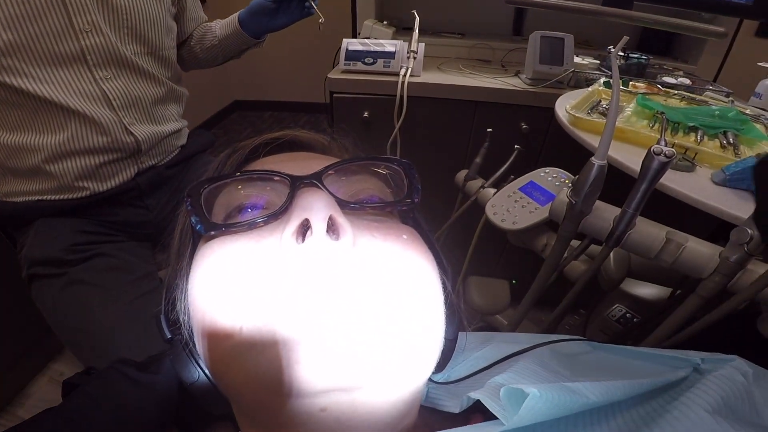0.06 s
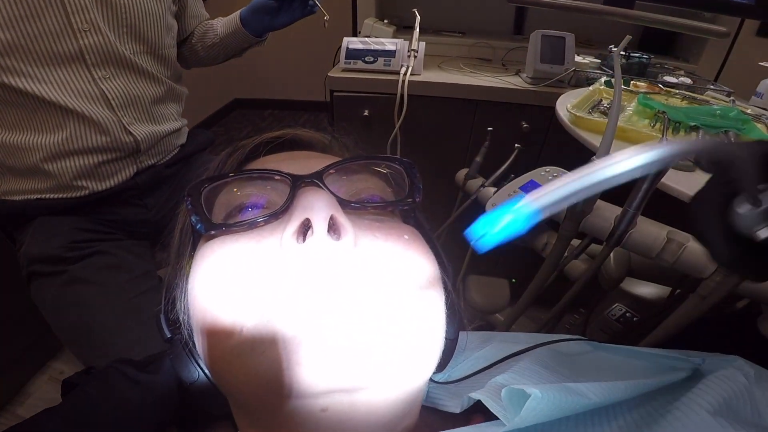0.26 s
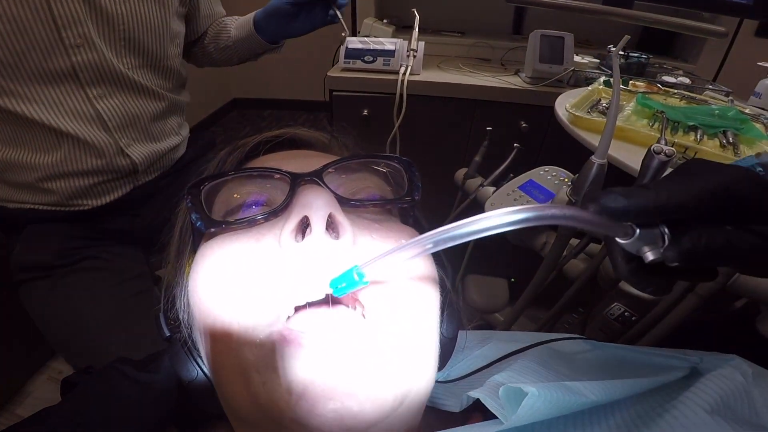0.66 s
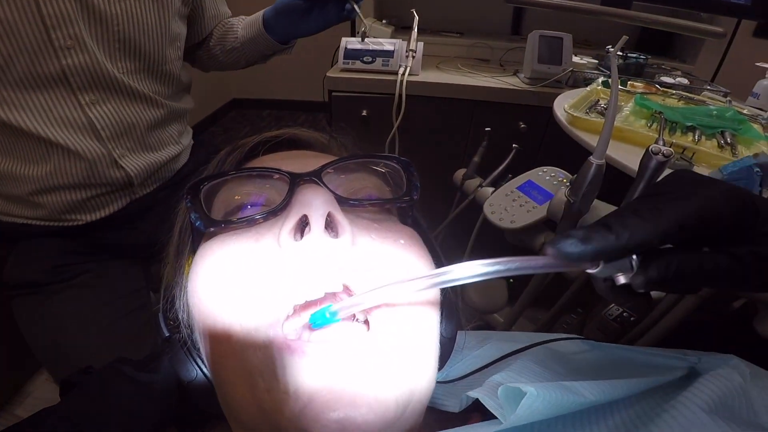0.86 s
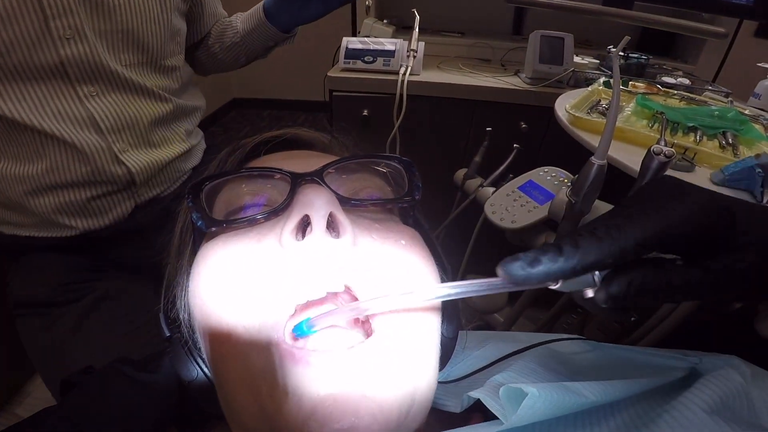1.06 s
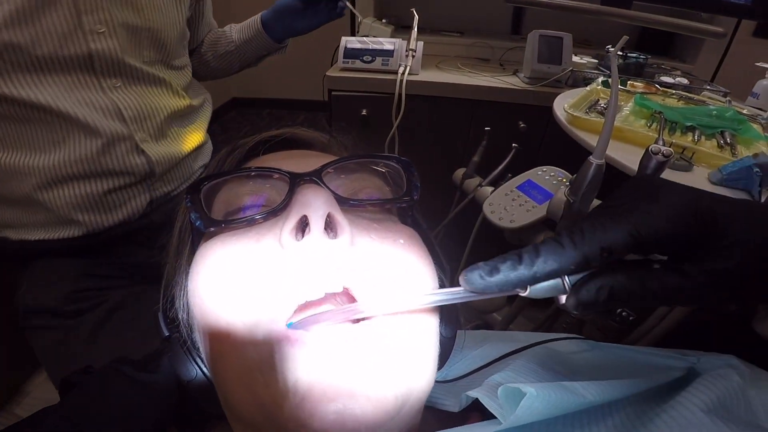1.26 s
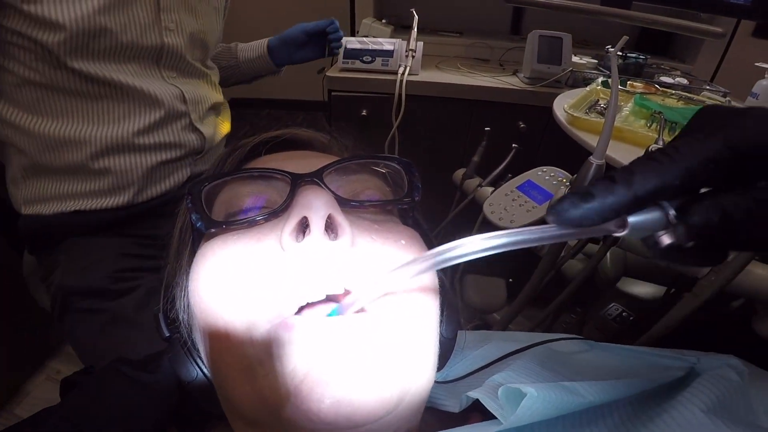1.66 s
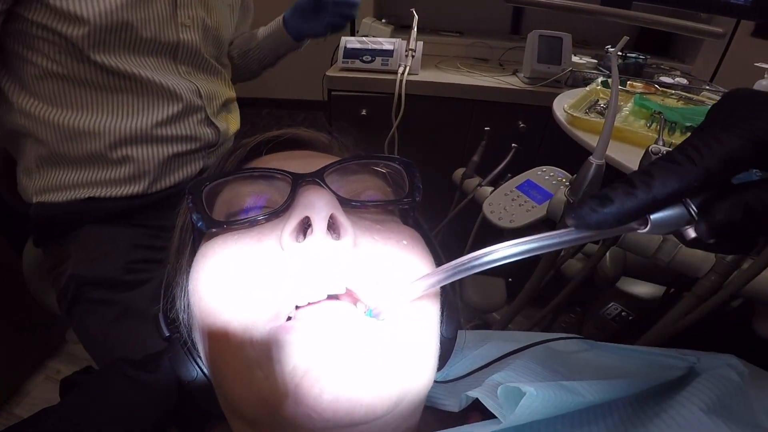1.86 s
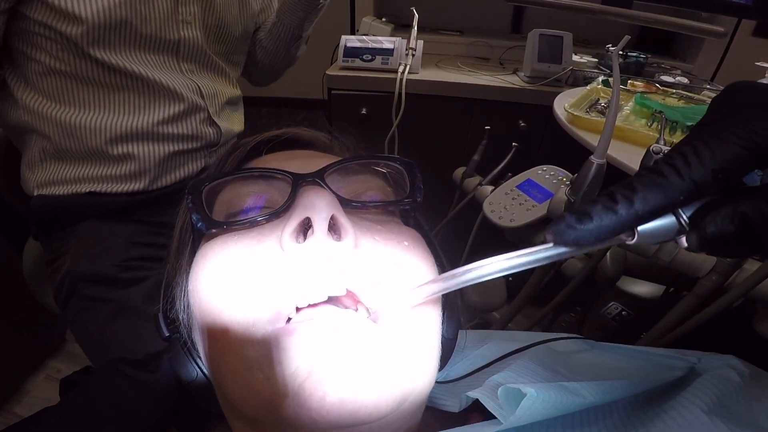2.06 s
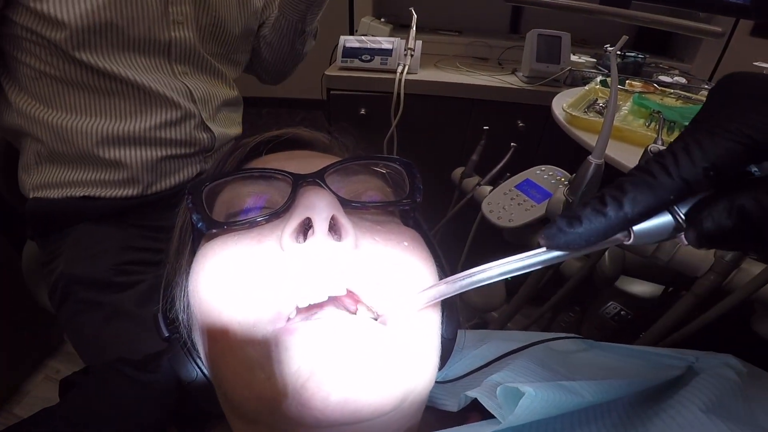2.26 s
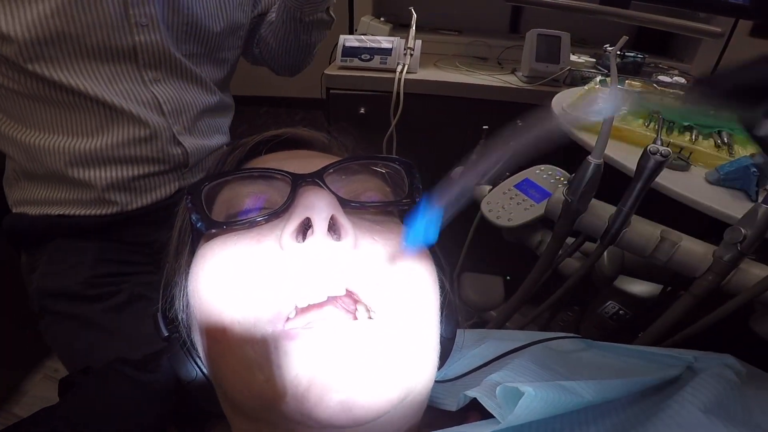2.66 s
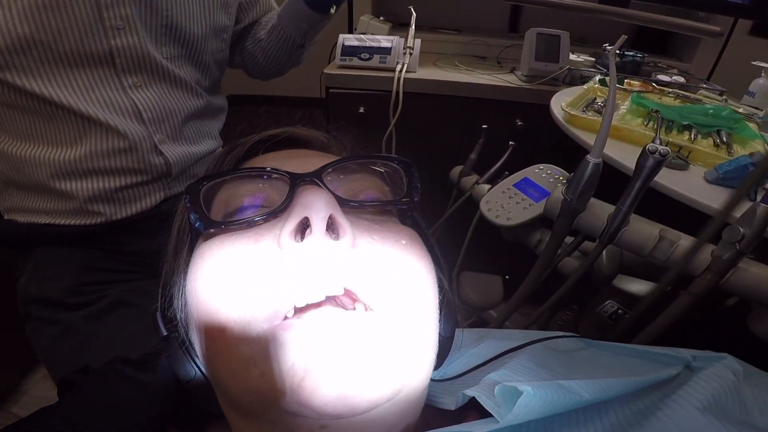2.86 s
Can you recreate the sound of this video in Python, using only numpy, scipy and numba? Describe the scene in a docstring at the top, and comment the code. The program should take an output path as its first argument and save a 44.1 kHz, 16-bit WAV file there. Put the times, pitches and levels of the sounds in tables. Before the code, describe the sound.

Close up, a dental suction tube hisses steadily, then draws saliva from a mouth in choppy slurps, sputters and brief squeaks. A valve click cuts it off, leaving the low ventilation hum of a small surgery.

```python
"""A small dental surgery with a low ventilation hum. A suction tube hisses as it nears an open mouth,
then draws saliva: the rush turns wet and rings the mouth cavity. The tip sticks to the cheek, frees
itself in slurps, squeaks and sputters, hisses again and is shut off with a snap of the valve.
The close microphone overloads on the loudest slurps."""
import sys
import numpy as np
from scipy import signal
from scipy.fft import rfft, irfft
from scipy.io import wavfile
from scipy.ndimage import map_coordinates
from numba import njit

SR = 44100
rng = np.random.default_rng(int(sys.argv[2]) if len(sys.argv) > 2 else 0)


def master_out(mix):
    """Clip the mix to full scale and print it as 16-bit PCM to the path in sys.argv[1]."""
    frames = np.transpose(np.atleast_2d(mix))
    ceiling = np.clip(frames, -1, 1)
    pcm = np.round(ceiling * 32767).astype(np.int16)
    wavfile.write(sys.argv[1], SR, pcm)


N = 132300

# envelope of the air jet at the tip: t/s, level/dB
JET_LEVEL = [(0, -37.5), (.015, -22.5), (.03, -47), (.078, -56), (.088, -33.5), (.14, -31), (.2, -23),
             (.3, -19), (.5, -17.5), (.9, -18.5), (1.2, -22), (1.36, -16), (1.46, -35), (1.51, -28),
             (1.62, -25.5), (1.74, -14.5), (1.85, -25), (1.9, -22), (1.97, -21), (2.01, -24), (2.03, -44),
             (2.06, -20), (2.14, -37), (2.21, -25), (2.265, -42), (2.32, -34), (2.38, -23), (2.45, -14.5),
             (2.5, -22), (2.65, -17.5), (2.752, -16.5), (2.764, -61)]
# tone of the jet in open air: f/Hz, level/dB
JET_SPECTRUM = [(300, -15.5), (1000, -14), (1700, -4.5), (2700, -4.5), (3400, 2.5), (4800, 2.5),
                (6500, 3.5), (7200, 0), (9300, -0.5), (10600, -1.5), (11900, 1.5), (15000, 1.5)]
# how far the tip is inside the mouth: t/s, depth/0-1
TIP_DEPTH = [(.6, 0.21), (1.05, 0.22), (1.7, 0.7), (2.5, 0.57), (2.66, 0)]
# saliva in the stream: t/s, wetness/0-1
WETNESS = [(.4, 0.08), (.85, 0.06), (1.2, 0.58), (1.45, 0.89), (1.7, 0.36), (2.1, 0.86), (2.45, 0.67),
           (2.75, 0.5)]
# resonances that take over from the open hiss inside the mouth: f/Hz, width/Hz, level/dB
JET_MODES = [(6610, 190, -2), (7840, 1100, -2), (9240, 710, -3.5), (10580, 910, -4.5), (12080, 1500, 1.5),
             (14170, 3200, 0)]
# echoes off teeth and cheek: delay/s, gain at full wetness, wander/share of the delay
CHEEK_ECHOES = [(.000343, 0.54, 0.074), (.00105, 0.074, 0.055)]
# sweep of the low mouth resonance: t/s, f/Hz
LOW_SWEEP = [(.7, 1780), (.9, 1525), (1.17, 1330), (1.29, 1398), (1.42, 1765), (1.53, 1823), (1.7, 1713),
             (1.82, 1470), (1.98, 1745), (2.08, 1926), (2.24, 1650), (2.42, 1420), (2.6, 1320)]
# its envelope: t/s, level/dB
LOW_LEVEL = [(.1, -68), (.6, -43), (.95, -30.5), (1.2, -28.5), (1.27, -17), (1.32, -18), (1.42, -23),
             (1.55, -18.5), (1.61, -21.5), (1.72, -21), (1.84, -23), (1.88, -42.5), (2.12, -38),
             (2.3, -44.5), (2.37, -32), (2.42, -18.5), (2.55, -24.5), (2.63, -39), (2.76, -57)]
# sweep of the middle mouth resonance, a pair of peaks: t/s, f/Hz, split/factor
MID_SWEEP = [(.7, 3870, 0.91), (1.15, 3970, 0.69), (1.29, 3874, 1), (1.5, 3806, 0.89), (1.65, 4150, 0.35),
             (1.78, 3760, 0.42), (2.12, 3890, 0.66), (2.33, 3950, 1), (2.46, 4140, 0.28)]
# its peaks: offset at split 1/Hz, width/Hz, level/dB
MID_PEAKS = [(-280, 510, 0.5), (294, 410, -0.5)]
# its envelope: t/s, level/dB
MID_LEVEL = [(.1, -62), (.35, -41), (.65, -30.5), (1.1, -25), (1.22, -22), (1.28, -13), (1.32, -22),
             (1.5, -13), (1.61, -26.5), (1.75, -23), (1.84, -18), (1.9, -38), (2.03, -42), (2.12, -17.5),
             (2.2, -30.5), (2.31, -31), (2.36, -22.5), (2.47, -16), (2.57, -22), (2.75, -37), (2.76, -78)]
# sweep of the high mouth resonance, also a pair: t/s, f/Hz
HIGH_SWEEP = [(.22, 4680), (.48, 5060), (.8, 5340), (1.0, 6000), (1.37, 5870), (1.44, 5130), (1.7, 5440),
              (1.875, 5720), (1.9, 5000), (1.925, 5730), (2.0, 6100), (2.22, 5670), (2.5, 6290),
              (2.65, 5820), (2.73, 4900)]
# its peaks: offset at split 1/Hz, width/Hz, level/dB
HIGH_PEAKS = [(-300, 700, 0.5), (293, 930, 1.5)]
# their spacing as the tip enters the mouth: t/s, split/factor
HIGH_SPACING = [(.45, 0.27), (1.1, 0.5), (1.35, 1.25), (1.75, 0.54), (2.2, 1), (2.5, 1.43), (2.7, 1.1)]
# their envelope: t/s, level/dB
HIGH_LEVEL = [(.1, -52), (.29, -24.5), (.8, -21.5), (1.15, -23.5), (1.38, -20), (1.45, -30), (1.52, -26.5),
              (1.62, -26), (1.75, -16.5), (1.85, -15.5), (1.9, -24), (2.01, -19), (2.04, -41), (2.15, -39),
              (2.21, -21.5), (2.26, -44), (2.33, -52), (2.43, -14.5), (2.56, -28.5), (2.62, -20.5),
              (2.75, -44), (2.76, -80)]
# bright ring of the tip against wet tissue: f/Hz, width/Hz, level/dB
TIP_PEAKS = [(8030, 1600, 0.5), (8500, 990, -2), (9050, 840, -2.5)]
# its envelope: t/s, level/dB
TIP_LEVEL = [(.8, -60), (1.15, -22.5), (1.34, -26.5), (1.52, -33.5), (1.63, -31.5), (1.74, -18.5),
             (1.86, -27.5), (1.91, -43), (1.99, -12), (2.03, -42), (2.07, -21.5), (2.14, -33.5),
             (2.3, -35.5), (2.44, -15.5), (2.52, -41), (2.76, -70)]
# low splatter of saliva in the tube: t/s, level/dB
SPLATTER_LEVEL = [(.07, -51.5), (.3, -43), (1.1, -37.5), (1.22, -38), (1.27, -25.5), (1.36, -43),
                  (1.6, -34.5), (1.85, -28.5), (1.89, -68), (2.32, -58), (2.42, -35), (2.49, -28),
                  (2.7, -28.5), (2.75, -33.5), (2.77, -64)]
# slurps as the tip breaks free: t/s, attack/s, length/s, low/dB, middle/dB, high/dB, spray/dB
SLURP_CUES = [(1.252, 0.012, 0.039, -13, -12.5, -16, -18), (1.328, 0.0067, 0.014, -18, -12, -17, -12),
              (1.361, .002, 0.062, -19.5, -18, -16, -22), (1.455, 0.0031, 0.016, -39, -11.5, -30, -17),
              (1.849, 0.0058, 0.011, -44, -10, -6, -8.5), (1.949, 0.0099, 0.029, -33, -33, -14.5, -21),
              (1.987, 0.0071, 0.0098, -16, -34, -23, -16), (2.044, .002, 0.0095, -45, -40, -23, -16),
              (2.053, 0.0014, 0.018, -19.5, -16.5, -37, -20.5), (2.072, 0.0035, 0.015, -14, -8.5, -49, -42),
              (2.216, 0.0041, 0.023, -17.5, -14.5, -30, -18), (2.357, 0.016, 0.018, -38, -13.5, -36, -18),
              (2.396, 0.012, 0.02, -14, -40, -14.5, -23)]
# squeaks of a narrow wet gap: t/s, length/s, first f/Hz, last f/Hz, width/Hz, level/dB
SQUEAK_CUES = [(1.86, 0.015, 3700, 3460, 400, -21), (1.864, 0.035, 7500, 4800, 1300, -14.5),
               (1.878, 0.023, 5200, 4250, 250, -16), (1.936, 0.011, 5350, 6940, 300, -6),
               (1.443, 0.031, 7100, 7300, 1400, -20), (1.978, 0.026, 3240, 3170, 300, -19.5),
               (2.05, 0.02, 2830, 3260, 710, -9.5), (2.165, 0.055, 11000, 12000, 1800, -23.5),
               (2.338, .011, 6960, 5700, 600, -24), (2.705, 0.021, 5060, 4570, 1100, -20)]
# bubbling pools of saliva: t/s, length/s, f/Hz, width/Hz, pops per s, level/dB, fade/dB per s
SPUTTER_CUES = [(1.231, 0.12, 2360, 1300, 720, -22, 2), (1.374, .19, 2380, 1300, 550, -19, 27),
                (1.802, 0.044, 2500, 1200, 970, -24, 0), (2.06, 0.051, 2500, 1000, 500, -21, 96),
                (2.09, 0.072, 3810, 800, 320, -15.5, 160)]
# single large bubbles bursting: t/s, f/Hz, ring/dB, click/dB
POP_CUES = [(1.281, 4210, -12, -18), (1.338, 3560, 2, -19), (1.362, 3650, -2, -12), (2.375, 3650, -10, -16),
            (2.406, 1480, -3.5, -1), (2.499, 1390, -7, -2), (2.556, 1330, -10, -26)]
# small plastic knocks: t/s, level/dB, f/Hz, width/Hz, decay/s
KNOCK_CUES = [(.082, -28, 490, 1040, 0.036), (2.7504, -6.5, 4800, 5940, 0.0015),
              (2.967, -33, 2570, 3980, 0.0016)]
# rumbles and low bubbles in the hose: t/s, length/s, f/Hz, width/Hz, level/dB
GULP_CUES = [(0.081, 0.033, 131.7, 109, -30), (1.149, 0.016, 1105, 400, -27.5),
             (1.928, 0.123, 208, 60, -39.5)]
# hollow ring of the empty tube as the valve opens: t/s, level/dB
TUBE_LEVEL = [(0, -35), (.018, -36), (.03, -67), (.078, -62), (.088, -34.5), (.16, -40), (.3, -39),
              (.7, -95)]
# tone of the ventilation rumble: f/Hz, level/dB
VENT_SPECTRUM = [(20, 3), (40, 5), (70, -14.5), (120, -4), (200, -13.5), (400, -21), (800, -29),
                 (4000, -31.5), (15000, -46)]
# partials of the ventilation hum: f/Hz, level/dB
VENT_HUM = [(40.5, -39), (59, -44.5), (82, -48)]

# modulation depths and droplet shares hold at full wetness; a drier stream gets less
GURGLE_PER_S, GURGLE_DB, FLUTTER_PER_S, FLUTTER_DB = 38, 2, 450, 2
SWAY_PER_S, SWAY_DB, SWAY_DRIFT = 22, 2.8, 0.011
DROPS_PER_S, DROP_SHARE, BLOBS_PER_S, BLOB_SHARE = 900, 0.24, 220, 0.64

JET_SWAY_PER_S, JET_SWAY_DB, JET_DRIFT, JET_FOLLOW = 14, 4, 0.017, 0.26
SPRAY_HZ, SPRAY_WIDTH_HZ, WET_RELEASE_S = 5600, 14200, 0.0065
POP_RING_S, POP_CLICK_S, POP_RISE_PER_S = 0.0033, 0.00093, 3
TUBE_HZ, TUBE_WIDTH_HZ = 890, 180
RUMBLE_DB, ROOM_T60_S, ROOM_DB, NEAR_DB = -36, 0.26, -15.5, -11.5
CEILING, TOP_HZ = 0.82, 15350


def suction():
    """The jet hisses and rings mouth and tip; saliva chops the flow; slurps drive it in bursts."""
    wet = curve(WETNESS)
    chop = undb(wet * (GURGLE_DB * gurgle() + FLUTTER_DB * walk(FLUTTER_PER_S)))
    low, mid, high, spray = sum(np.outer(undb(levels), gate(start, length, attack, WET_RELEASE_S))
                                for start, attack, length, *levels in SLURP_CUES)
    cavity = mouth(wet, low, mid, high)
    hiss = jet(wet) + spray * ring(stream(wet), SPRAY_HZ, SPRAY_WIDTH_HZ)
    hiss = cheek_echoes(hiss, wet)
    tip = modes(wet, TIP_PEAKS) * undb(curve(TIP_LEVEL))
    splatter = ring(stream(wet), hz=720, width=2540) * undb(curve(SPLATTER_LEVEL))
    return chop * (cavity + hiss + tip + splatter)


def jet(wet):
    """Smooth hiss in the open; inside the mouth it breaks into resonances that glide with its shape."""
    depth, high_hz = curve(TIP_DEPTH), curve(HIGH_SWEEP)
    glide = (high_hz / np.average(high_hz, weights=depth)) ** JET_FOLLOW
    enclosed = 0
    for hz, width, db in JET_MODES:
        gain = undb(db + JET_SWAY_DB * walk(JET_SWAY_PER_S))
        enclosed += gain * ring(stream(wet), hz * glide * (1 + JET_DRIFT * walk(JET_SWAY_PER_S)), width)
    open_air = colour(stream(wet), JET_SPECTRUM)
    return (np.sqrt(1 - depth) * open_air + np.sqrt(depth) * unit(enclosed)) * undb(curve(JET_LEVEL))


def mouth(wet, low_slurp, mid_slurp, high_slurp):
    """Air and slurps ring three mouth resonances; coarse blobs of saliva make the low one bubble."""
    low_hz = curve(LOW_SWEEP)
    core = sway(stream(wet, BLOBS_PER_S, BLOB_SHARE), wet, low_hz, width=155)
    skirt = sway(stream(wet), wet, hz=low_hz + 115, width=680)
    low = unit(core + undb(-2) * skirt)
    mid = modes(wet, MID_PEAKS, curve(MID_SWEEP), split=curve(MID_SWEEP, column=2))
    high = modes(wet, HIGH_PEAKS, curve(HIGH_SWEEP), split=curve(HIGH_SPACING))
    return (low * np.hypot(undb(curve(LOW_LEVEL)), low_slurp)
            + mid * np.hypot(undb(curve(MID_LEVEL)), mid_slurp)
            + high * np.hypot(undb(curve(HIGH_LEVEL)), high_slurp))


def stream(wet, rate=DROPS_PER_S, share=DROP_SHARE):
    """Turbulent air, grainier with droplets the wetter it gets."""
    share = share * wet
    return np.sqrt(1 - share) * noise() + np.sqrt(share) * drops(rate, scatter_db=4)


def drops(rate, scatter_db):
    """Randomly timed droplet clicks of uneven size."""
    return unit((rng.random(N) < rate / SR) * np.sign(noise()) * undb(scatter_db * noise()))


def gurgle():
    """Plugs of saliva gather, choke the flow and give way: an uneven sawtooth, rms 1."""
    phase = np.cumsum(GURGLE_PER_S * np.exp(.5 * walk(GURGLE_PER_S))) / SR
    return unit(.5 - phase % 1)


def modes(wet, peaks, centre=0, split=1):
    """The stream rings a set of swaying peaks, rms 1."""
    return unit(sum(undb(db) * sway(stream(wet), wet, centre + split * hz, width)
                    for hz, width, db in peaks))


def sway(x, wet, hz, width):
    """A resonance of soft, moving tissue: its centre drifts and its strength comes and goes."""
    drifting_hz = hz * (1 + SWAY_DRIFT * wet * walk(SWAY_PER_S))
    return ring(x, drifting_hz, width) * unit(undb(SWAY_DB * wet * walk(SWAY_PER_S)))


def cheek_echoes(x, wet):
    """Very short, shifting echoes flange the hiss, more deeply as the stream turns wet."""
    for delay, gain, wander in CHEEK_ECHOES:
        lag = delay * SR * (1 + wander * walk(SWAY_PER_S))
        echo = map_coordinates(x, [np.arange(N) - lag], mode="nearest")
        x = (x + gain * wet * echo) / np.hypot(1, gain * wet)
    return x


def squeaks():
    """Air whistles through a gap that opens or closes."""
    out = 0
    for start, length, first, last, width, db in SQUEAK_CUES:
        progress = np.clip((clock() - start) / length, 0, 1)
        hz = first + (last - first) * progress
        out += undb(db) * np.sin(np.pi * progress) * ring(noise(), hz, width)
    return out


def sputters():
    """Saliva films burst in quick, crackling runs."""
    out = 0
    for start, length, hz, width, rate, db, fade in SPUTTER_CUES:
        gain = undb(db - fade * np.clip(clock() - start, 0, length))
        envelope = gate(start, length, attack=0.0057, release=WET_RELEASE_S)
        out += gain * envelope * ring(drops(rate, scatter_db=0.5), hz, width)
    return out


def pops():
    """A large bubble bursts with a click and rings briefly at a slightly rising pitch."""
    out = 0
    for start, hz, ring_db, click_db in POP_CUES:
        age = np.maximum(clock() - start, 0)
        cycles = hz * age * (1 + POP_RISE_PER_S * age / 2)
        tone = np.sin(2 * np.pi * cycles) * gate(start, 0, 1 / hz, POP_RING_S)
        click = ring(noise(), SPRAY_HZ, SPRAY_WIDTH_HZ) * gate(start, 0, 1 / hz, POP_CLICK_S)
        out += undb(ring_db) * tone + undb(click_db) * click
    return out


def knocks():
    """Handling of the tube and the snap of its valve."""
    return sum(undb(db) * gate(start, 0, attack=0.00037, release=decay) * ring(noise(), hz, width)
               for start, db, hz, width, decay in KNOCK_CUES)


def gulps():
    """Dull, brief rumbles in the hose."""
    return sum(undb(db) * gate(start, length, attack=0.011, release=0.014) * ring(noise(), hz, width)
               for start, length, hz, width, db in GULP_CUES)


def empty_tube():
    """The first rush of air sounds the third to fifth pipe modes of the empty tube."""
    pipe = sum(ring(noise(), k * TUBE_HZ, TUBE_WIDTH_HZ) for k in (3, 4, 5))
    return undb(curve(TUBE_LEVEL)) * unit(pipe)


def room(x):
    """Quick reflections from face and hand, then the short tail of the surgery."""
    t = clock()
    near = noise() * gate(0.00087, 0, attack=0.00065, release=0.002)
    tail = noise() * (t > .005) * undb(-60 * t / ROOM_T60_S)
    echo = undb(NEAR_DB) * near / np.linalg.norm(near) + undb(ROOM_DB) * tail / np.linalg.norm(tail)
    return x + signal.fftconvolve(x, echo)[:N]


def ventilation():
    """A bed of air rumble under a wavering hum."""
    hum = 0
    for hz, db in VENT_HUM:
        peak = np.sqrt(2) * undb(db + 3.6 * walk(rate=4.7))
        hum += peak * np.sin(2 * np.pi * hz * clock() + .5 * walk(rate=5.52))
    return hum + undb(RUMBLE_DB) * colour(noise(), VENT_SPECTRUM)


def undb(db):
    """Decibels to gain."""
    return 10 ** (np.asarray(db) / 20)


def unit(x):
    """Scale to rms 1."""
    return x / np.sqrt(np.mean(x ** 2))


def clock():
    """Time of each sample in seconds."""
    return np.arange(N) / SR


def curve(rows, column=1):
    """Automation lane: straight lines between a table's breakpoints."""
    columns = np.array(rows, float).T
    return np.interp(clock(), np.sort(columns[0]), columns[column])


def gate(start, length, attack, release):
    """Linear attack, then exponential release from length seconds after the start."""
    t = clock() - start
    return np.clip(t / attack, 0, 1) * np.exp(-np.maximum(t - length, 0) / release)


def noise():
    """White noise."""
    return rng.standard_normal(N)


def walk(rate):
    """Random wander through rate points a second, rms 1."""
    return unit(np.interp(clock() * rate, np.arange(N), noise()))


def colour(x, points):
    """Equalise x along (f/Hz, level/dB) points, rms 1."""
    hz, db = np.array(points, float).T
    f = np.maximum(np.arange(N // 2 + 1) * SR / N, 1)
    return unit(irfft(rfft(x) * undb(np.interp(np.log(f), np.log(hz), db)), N))


def ring(x, hz, width):
    """A steep resonance from two band-passes in series, rms 1."""
    hz, width = hz * np.ones(N), float(width)
    return unit(bandpass(bandpass(x, hz, width), hz, width))


@njit
def bandpass(x, hz, width):
    """State-variable band-pass whose centre can sweep."""
    y, band, low = np.empty(len(x)), 0., 0.
    for i in range(len(x)):
        g, damping = np.tan(np.pi * hz[i] / SR), width / hz[i]
        v = (band + g * (x[i] + 1e-18 - low)) / (1 + g * (g + damping))
        band, low = 2 * v - band, low + 2 * g * v
        y[i] = damping * v
    return y


def scene():
    """All sources in the room over the ventilation bed, the same in both channels."""
    close = empty_tube() + suction() + squeaks() + sputters() + pops() + knocks() + gulps()
    mono = room(close) + ventilation()
    return np.array([mono, mono])


def record(dry):
    """The close microphone clips the loudest peaks; a steep low-pass cuts the top."""
    lowpass = signal.ellip(10, .2, 60, TOP_HZ, fs=SR, output="sos")
    return signal.sosfilt(lowpass, np.clip(dry, -CEILING, CEILING))


dry = scene()
out = record(dry)
master_out(out)
```